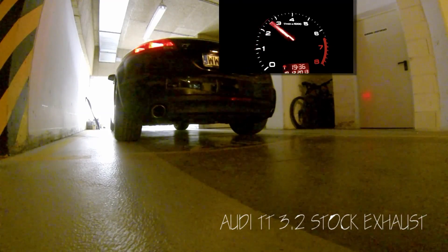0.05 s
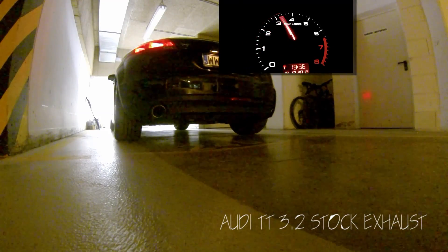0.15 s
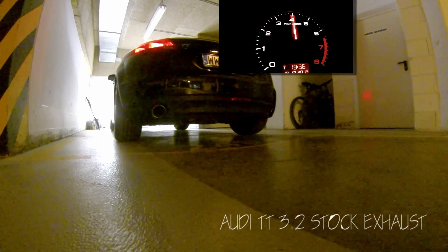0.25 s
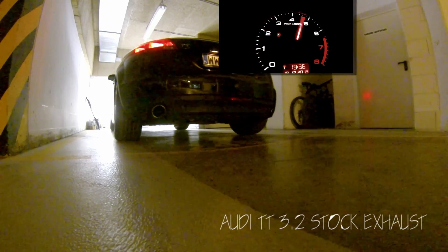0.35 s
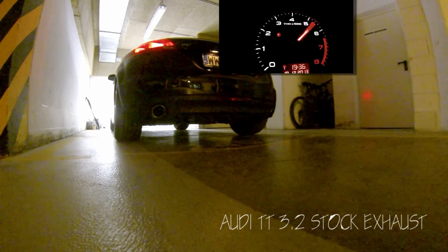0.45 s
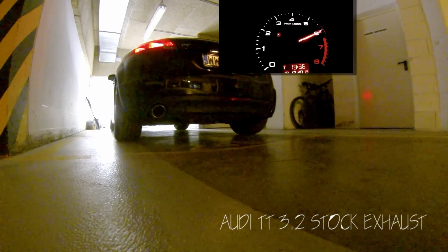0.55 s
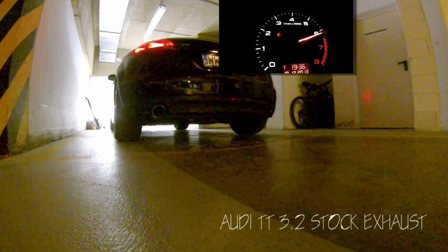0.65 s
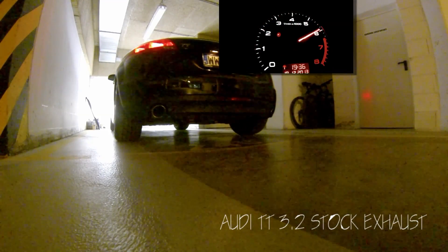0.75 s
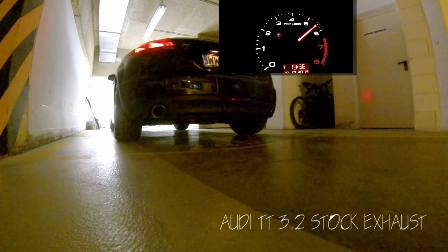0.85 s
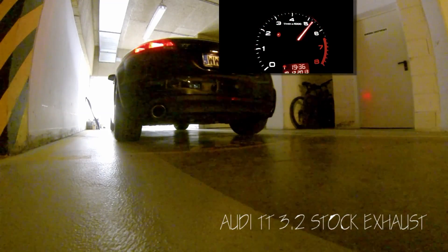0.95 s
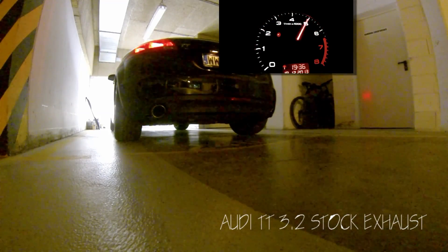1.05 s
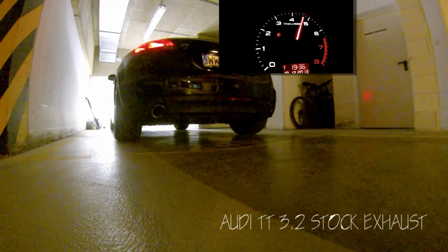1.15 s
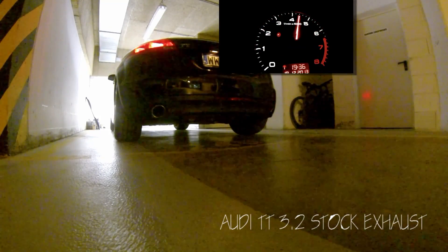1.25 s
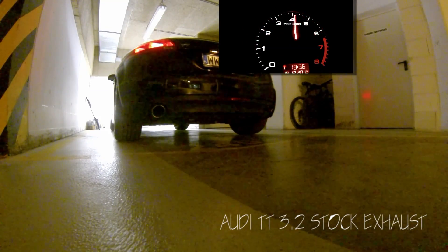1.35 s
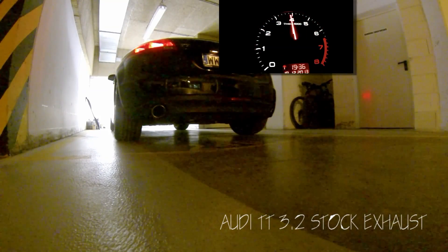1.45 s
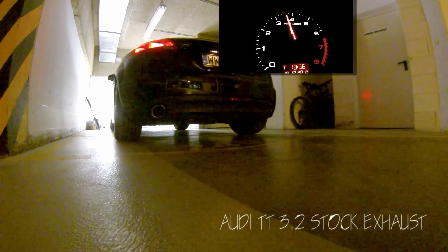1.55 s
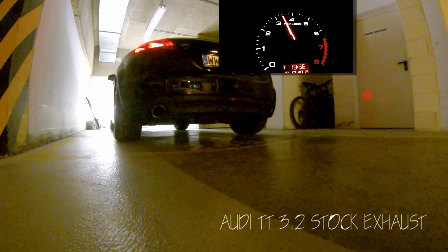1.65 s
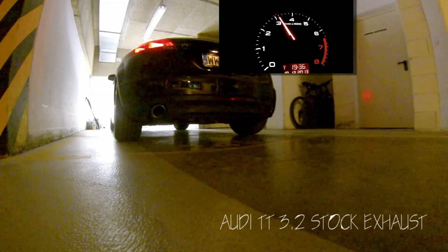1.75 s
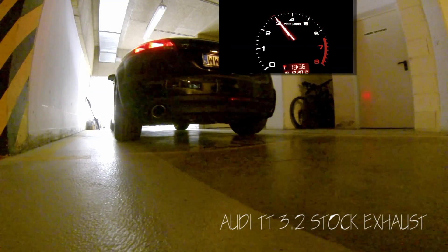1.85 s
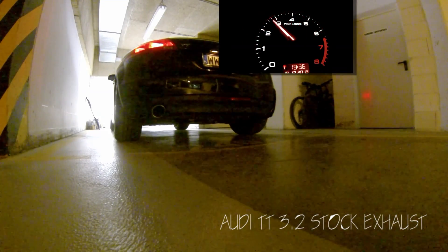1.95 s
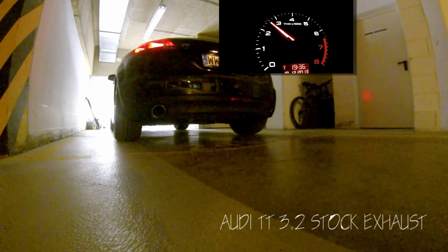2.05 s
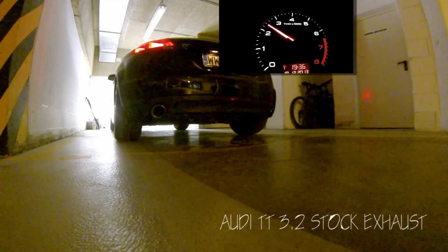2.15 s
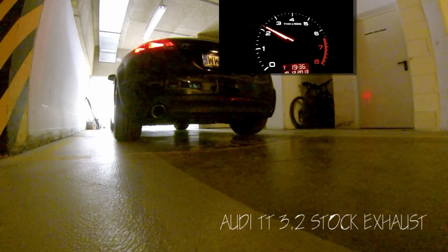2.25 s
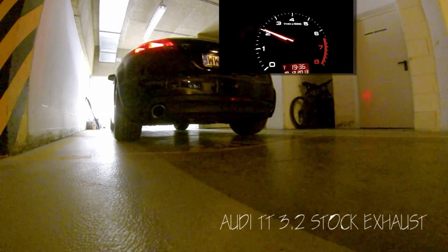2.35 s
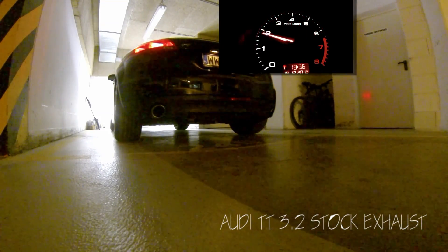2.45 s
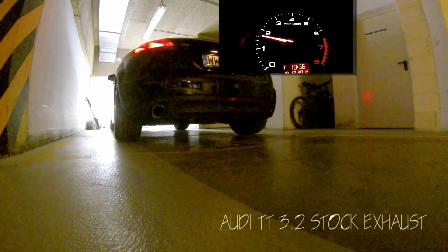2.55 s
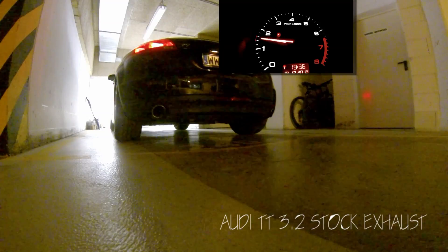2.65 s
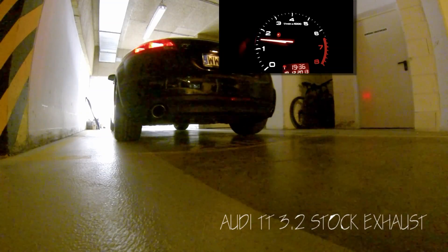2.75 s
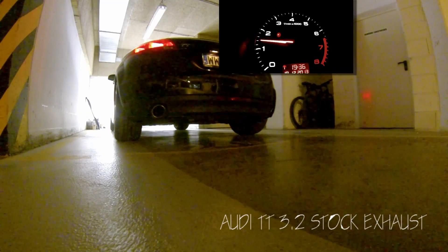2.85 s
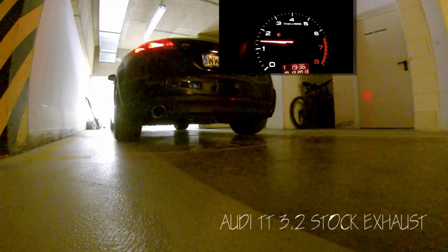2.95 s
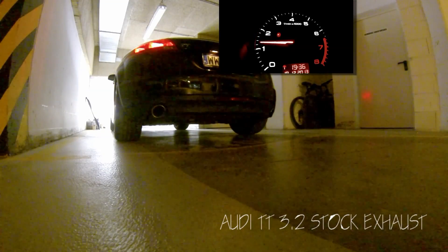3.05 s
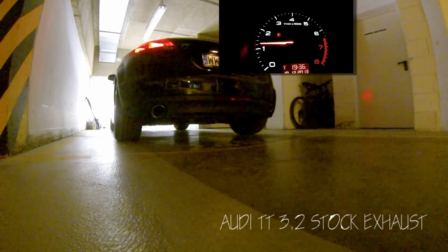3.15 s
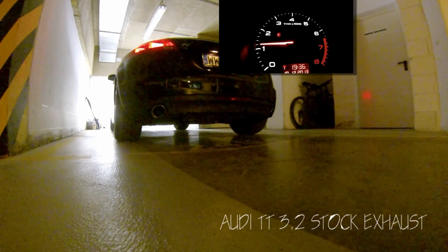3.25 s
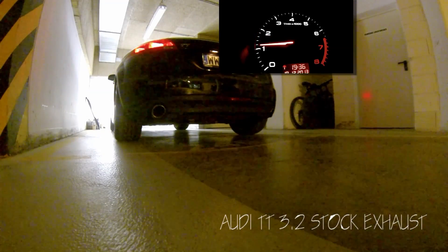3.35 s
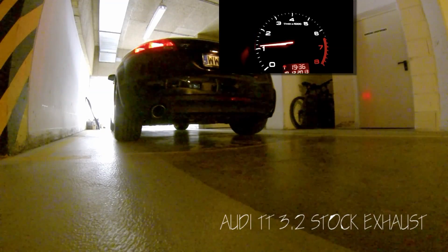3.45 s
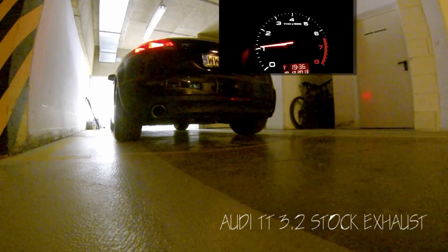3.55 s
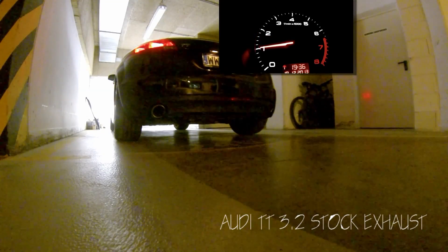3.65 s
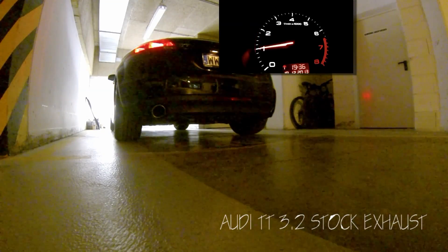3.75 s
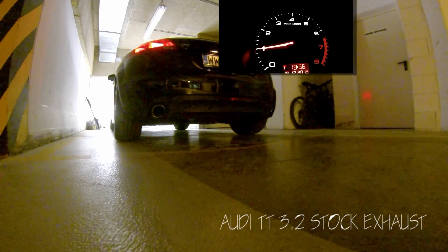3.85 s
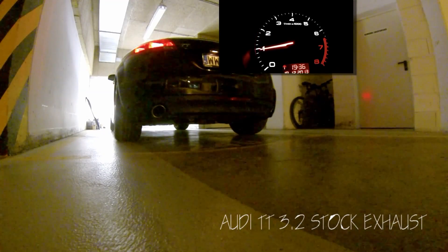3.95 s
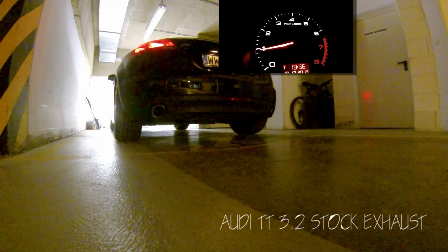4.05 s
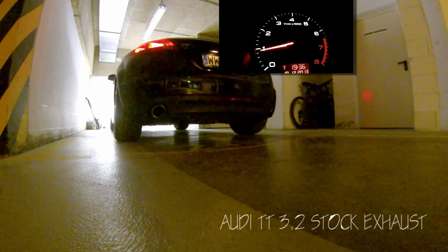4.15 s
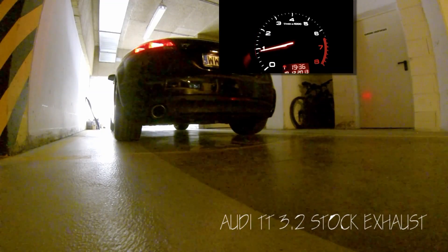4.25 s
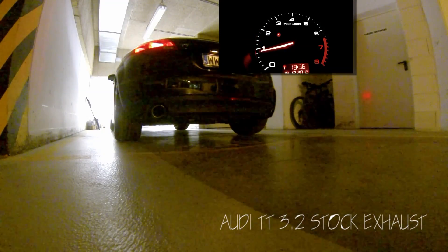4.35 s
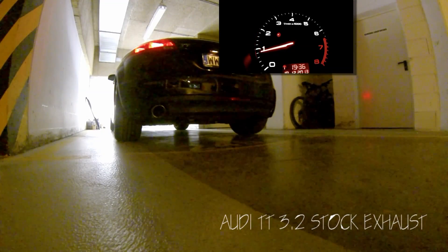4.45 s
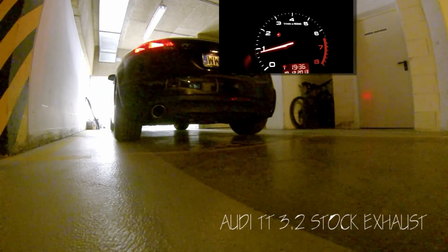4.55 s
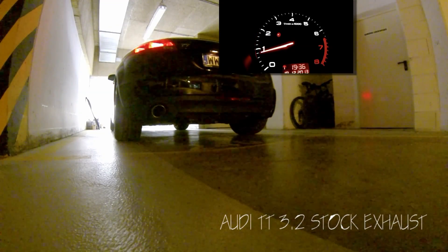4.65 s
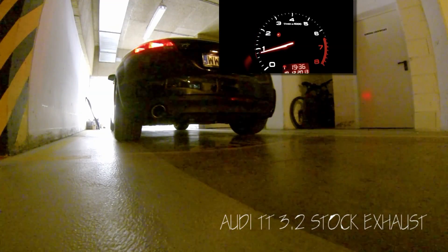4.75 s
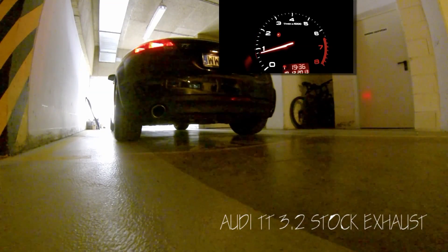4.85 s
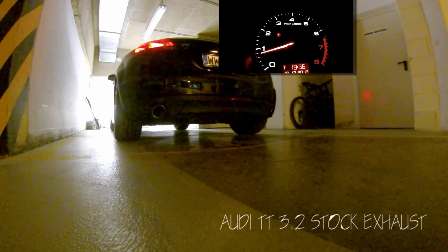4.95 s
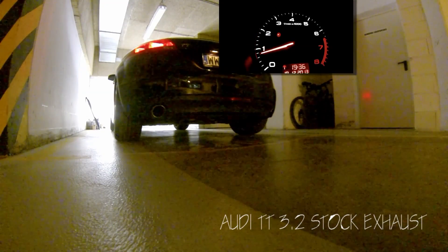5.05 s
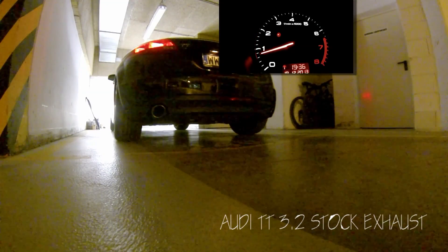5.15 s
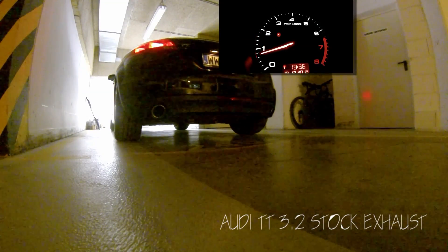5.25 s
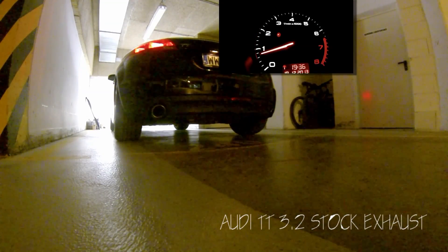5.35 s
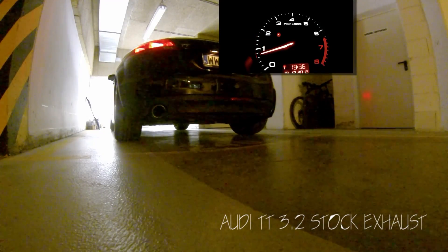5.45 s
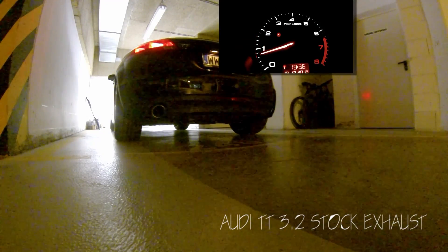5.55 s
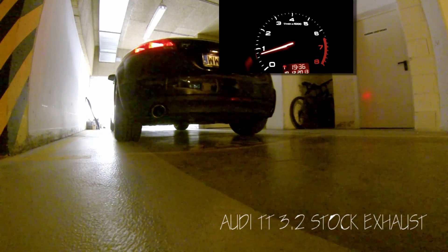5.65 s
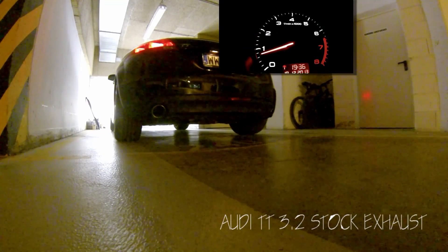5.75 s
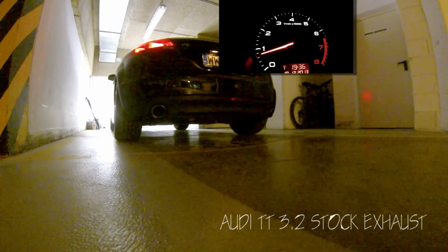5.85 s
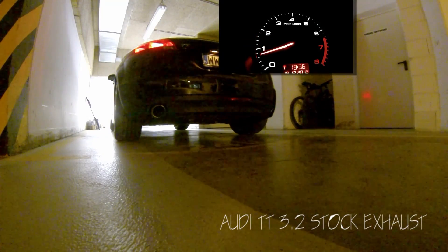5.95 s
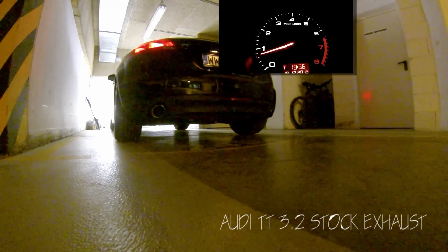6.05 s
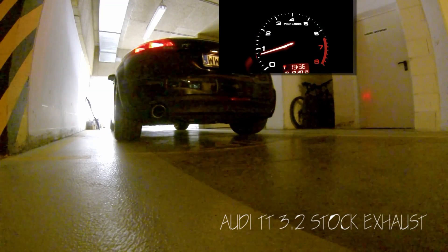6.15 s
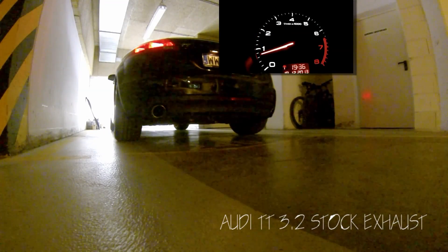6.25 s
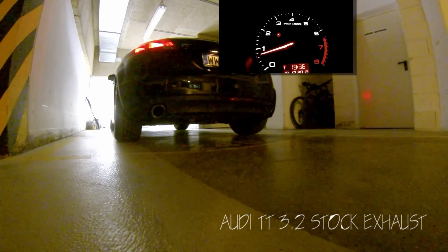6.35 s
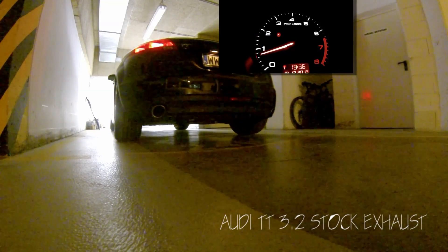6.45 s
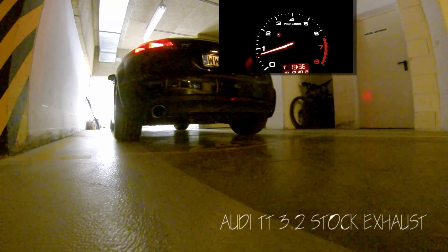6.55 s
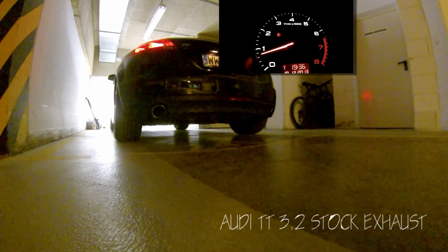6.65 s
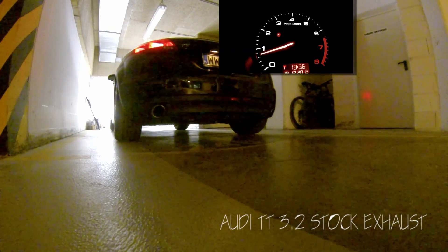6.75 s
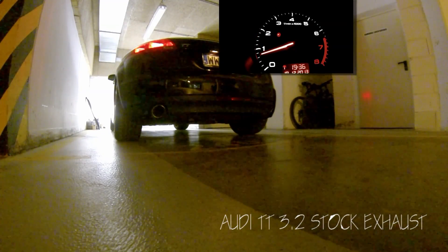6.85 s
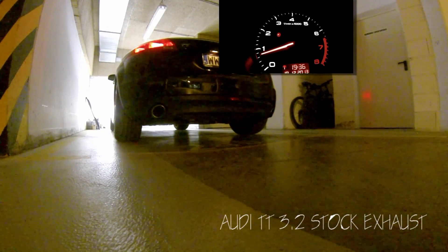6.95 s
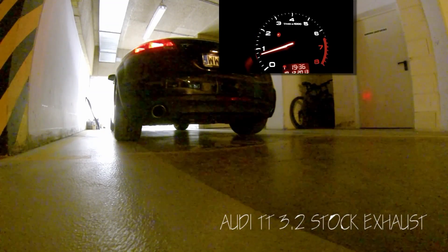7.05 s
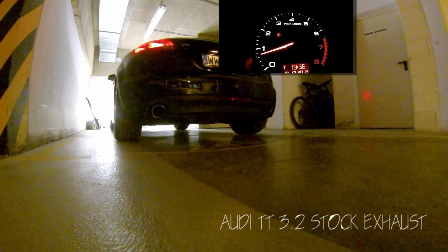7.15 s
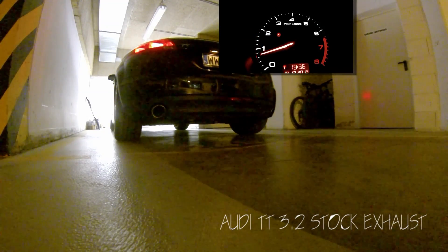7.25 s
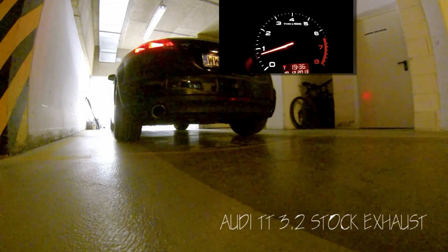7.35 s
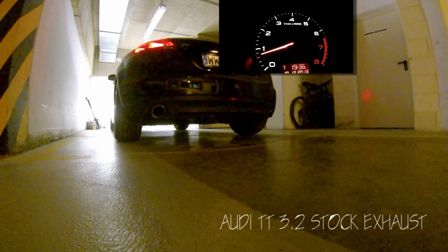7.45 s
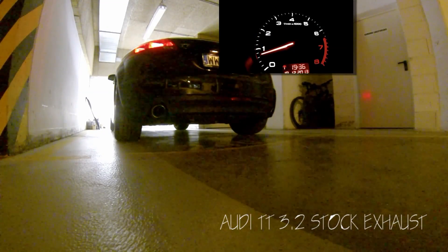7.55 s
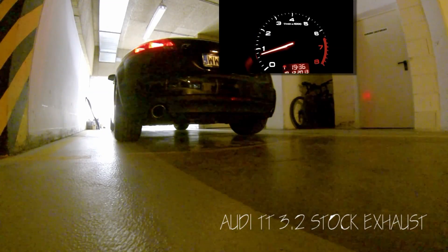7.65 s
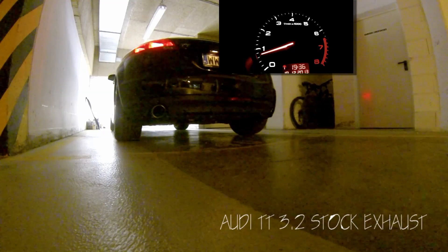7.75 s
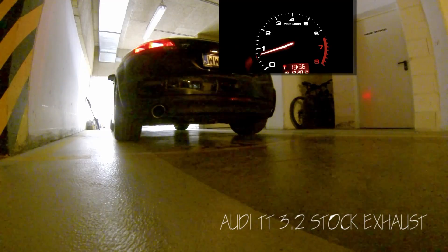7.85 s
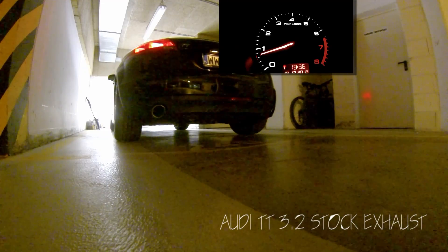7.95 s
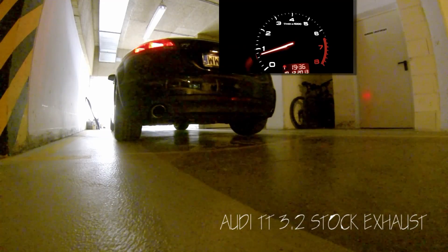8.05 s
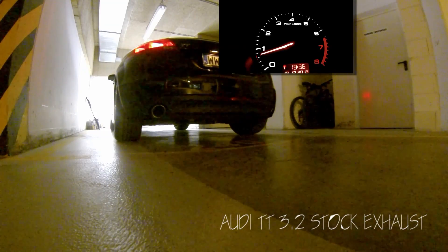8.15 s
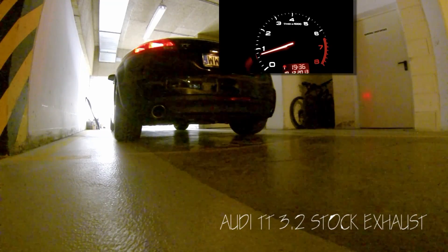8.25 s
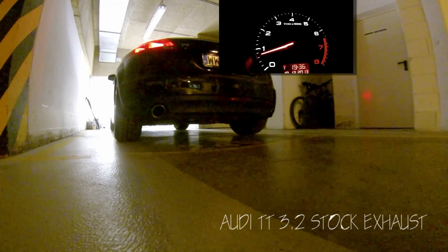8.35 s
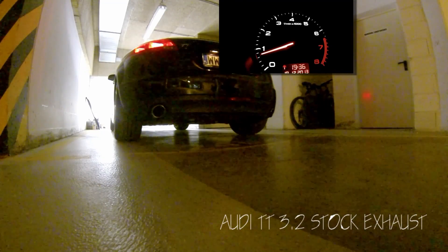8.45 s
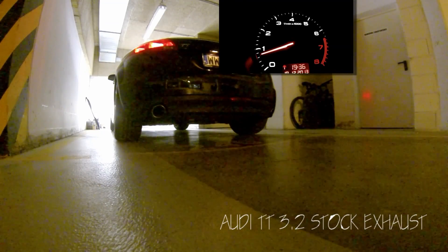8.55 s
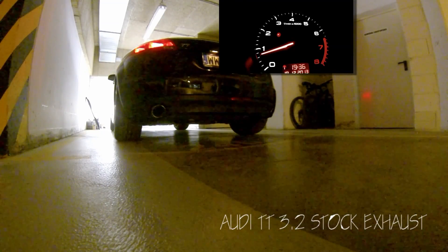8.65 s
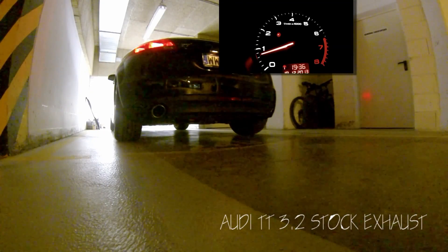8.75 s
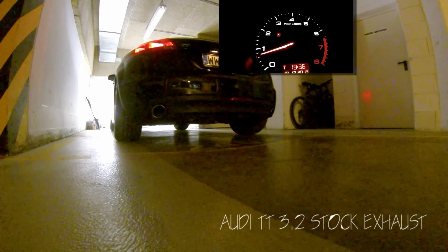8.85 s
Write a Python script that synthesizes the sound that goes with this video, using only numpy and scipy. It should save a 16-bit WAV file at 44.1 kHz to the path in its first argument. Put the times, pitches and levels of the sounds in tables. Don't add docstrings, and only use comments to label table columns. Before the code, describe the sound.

A six-cylinder car stands in an enclosed concrete garage, heard from behind by a small camera microphone. From 0 seconds the engine is already rising, its low growl sweeping fast to a loud, throaty peak near 0.7 seconds. Gas roars in the tailpipe, barking at about 0.25, and short dull pops crackle between 0.3 and 0.9, with brief garage echoes. Near 0.95 the throttle shuts; the roar drops back and the pitch glides smoothly down until 3 seconds, a hollow drone under bright engine-bay hiss. Around 3 the fuel returns, with a small rise in speed near 3.5. A faint high whine appears about 3.7 to 4.3 and sinks away. From 4 to 5.5 the note lowers, lumpy and slightly uneven. From about 6 to 8.9 seconds it idles quietly and steadily, a low regular burble with soft gas noise, gentle valve ticking and a slow, faint throb in the hiss.

```python
import sys
import numpy as np
from scipy import signal
from scipy.fft import rfft, irfft, next_fast_len
from scipy.io import wavfile

SR = 44100
rng = np.random.default_rng(int(sys.argv[2]) if len(sys.argv) > 2 else 0)


def to_wav(s):
    ch = np.atleast_2d(s).T
    pcm = np.round(np.clip(ch, -1, 1) * 32767)
    wavfile.write(sys.argv[1], SR, pcm.astype(np.int16))


def undo_db(level):
    steps = np.asarray(level, float) / 20
    return 10 ** steps


N = 392931
TIME = np.arange(N) / SR
THROTTLE_SHUT_S, FUEL_BACK_S, PUMPING_ENDS_S = 0.95, 2.93, 3.36
IDLE_FROM_S, IDLE_REACHED_S = 3.68, 5.84

# multiple of the four-stroke cycle, then level in dB with throttle open,
# in dB coasting, in dB with fuel back, in dB at idle.
LEADING_ORDERS = [
    (2, -36, -50, -51, -78),
    (4, -30, -31, -58, -76),
    (6, -35, -41, -30, -40),
    (8, -33, -35.5, -51, -67),
    (12, -32, -32.5, -45.5, -49.5),
]


def in_time(rows):
    s, *columns = np.transpose(rows)
    return [np.interp(TIME, s, c) for c in columns]


def at_hz(points, hz):
    point_hz, value = np.transpose(points)
    return np.interp(np.log(hz + 1), np.log(point_hz), value)


def rms_one(x):
    return x / np.sqrt(np.mean(x ** 2) + 1e-20)


def ramp(from_s, to_s):
    return np.clip((TIME - from_s) / (to_s - from_s), 0, 1)


def hump(s, width_s):
    return np.exp(-((TIME - s) / width_s) ** 2)


def drift(rate, step=1):
    r = np.exp(-80 * np.pi * rate / SR)
    slow = signal.lfilter([1], [1, -2 * r, r * r], rng.standard_normal(N // 40 + 2002))[2000:]
    return np.interp(np.arange(0, N, step) / 40, np.arange(len(slow)), rms_one(slow))


def coloured(spectrum, low_hz, high_hz):
    size = next_fast_len(N)
    hz = np.arange(size // 2 + 1) * SR / size
    bins = rfft(rng.standard_normal(size)) * undo_db(at_hz(spectrum, hz))
    inside = irfft(bins * (hz > low_hz) * (hz < high_hz), size)
    return irfft(bins, size)[:N] / inside.std()


def resonate(x, hz, width):
    r = np.exp(-np.pi * width / SR)
    zeros = np.array([1, 0, -1]) * (1 - r * r) / 2
    return signal.lfilter(zeros, [1, -2 * r * np.cos(2 * np.pi * hz / SR), r * r], x)


def by_state(open_db, coast_db, fired_db, idle_db, fired_s):
    shut = ramp(THROTTLE_SHUT_S - .03, THROTTLE_SHUT_S + 0.034)
    fired = ramp(fired_s - .06, fired_s + 0.1)
    idle = ramp(IDLE_FROM_S, IDLE_REACHED_S)
    return open_db + shut * (coast_db - open_db) + fired * (fired_db - coast_db) + idle * (idle_db - fired_db)


def garage(x):
    size = next_fast_len(N + SR)
    w = 2 * np.pi * np.arange(size // 2 + 1) / size
    t60_s = .6 / (1 + w * SR / 22000)
    echo = 0
    for k, lag in enumerate(rng.uniform(.02, .06, 10) * SR):
        loop = undo_db(-60 * lag / SR / t60_s) * np.exp(-1j * w * round(lag))
        echo = echo + (-1) ** k * loop / (1 - loop)
    wet = irfft(rfft(x, size) * echo, size)[:N] / np.sqrt(10)
    return x + undo_db(-7) * wet


def standing_gain(hz):
    # mode in Hz, width in Hz, level in dB.
    wall_modes = [(36.93, 0.83, 0), (50.3, 3.95, 10), (80.7, 9.6, 1), (288, 45, 2.5), (411, 87, 3)]
    hz = hz[::32]
    waves = 1 + sum(undo_db(db) / (1 + 2j * (hz - mode_hz) / width) for mode_hz, width, db in wall_modes)
    node_db = -8.5 * np.exp(-((hz - 43.4) / 2.55) ** 2)
    silencer_db = -11 / (1 + (94 / hz) ** 8)
    return np.repeat(np.abs(waves) * undo_db(node_db + silencer_db), 32)[:N]


def cavities(swing_db):
    # resonance in Hz, width in Hz.
    modes = [(51, 4), (201, 8), (325, 14), (462, 20), (1008, 40), (1660, 60), (1822, 30)]
    # level in dB at mean gas effort, share of the gas swing.
    flow = [(-58, 0.94), (-63, .5), (-72, 0.43), (-54.5, 0.66), (-62, .6), (-57, 0.64), (-61, 0.75)]
    # cavity in Hz, start in seconds, end in seconds, level in dB.
    swells = [(51, 0.24, 0.23, -17.5), (51, 0.55, 0.66, -26.5), (51, 0.91, 0.92, -25), (51, 3.2, 3.03, -29),
              (51, 3.3, 3.48, -34.5), (51, 4.6, 4.8, -38.5), (201, .48, 0.67, -27), (325, 2.3, 2.75, -37.5),
              (1008, 5.45, 9, -60), (1822, 1.76, 2.5, -41), (1822, 2.5, 3.18, -50.5)]
    swell_db_per_s = 90
    white, out = rng.standard_normal(N), 0
    for (hz, width), (db, share) in zip(modes, flow):
        db = db + share * swing_db
        for swell_hz, from_s, to_s, top_db in swells:
            if abs(swell_hz / hz - 1) < .08:
                outside_s = np.maximum(np.maximum(from_s - TIME, TIME - to_s), 0)
                db = np.maximum(db, top_db - swell_db_per_s * outside_s)
        ringing = resonate(resonate(white, hz, 1.5 * width), hz, 1.5 * width)
        out = out + undo_db(db) * rms_one(ringing)
    return out


def hiss(fast, turn, level_db, jet_db):
    # frequency in Hz, density in dB.
    bay_revving = [(650, -36), (1100, -3), (1450, -3.5), (1830, 1.5), (2520, -10), (3010, -9.5),
                   (3620, -16.5), (4610, -25.5), (5180, -27.5), (5860, -32.5), (7000, -42), (9100, -81),
                   (15400, -120)]
    bay_idling = [(650, -32), (1100, 3.5), (1180, -5.5), (1280, 1), (1400, -7.5), (1620, 2), (1890, -5),
                  (2040, -2.5), (2600, -11), (3030, -5.5), (3490, -14), (4360, -16.5), (7000, -37.5),
                  (9100, -71), (15400, -120)]
    jet_spectrum = [(2650, 8), (4500, -1.5), (5170, -2), (5870, -10.5), (6530, -8), (7090, -11),
                    (8570, -8.5), (9880, -15), (11100, -14.5), (12000, -9.5), (12800, -17), (13300, -21.5),
                    (15300, -14)]
    bay = fast * coloured(bay_revving, 1300, 4500) + (1 - fast) * coloured(bay_idling, 1300, 4500)
    throb_db = 1.6 * (1 - fast) * np.cos(2 * np.pi * 4.06 * (TIME - 7.01))
    ticking = 1 + 0.07 * np.cos(6 * turn + 1)
    jet = coloured(jet_spectrum, 6780, 10000) * undo_db(jet_db + 0.48 * drift(90))
    return bay * undo_db(level_db + throb_db + 0.55 * drift(17)) * ticking + jet


def whine(turn):
    # time in seconds, level in dB.
    whine_level = [
        (0, -68),
        (3.4, -87),
        (3.65, -60.5),
        (4.0, -58),
        (4.3, -65),
        (8.91, -83),
    ]
    return undo_db(in_time(whine_level)[0]) * np.sqrt(2) * np.cos(48 * turn)


def roar(fast, turn, level_db, pipe_db):
    # frequency in Hz, density in dB per Hz.
    gas_revving = [(18, -33), (30, -3), (81, 5), (155, -3), (243, -7.5), (319, -3.5), (524, -7),
                   (571, -5.5), (1020, -8.5), (1320, -25), (1800, -15.5), (2340, -23.5), (3960, -120)]
    gas_idling = [(18, -32), (30, -6), (59, -26), (251, -19), (319, -22.5), (465, -27), (524, -29),
                  (892, -30.5), (1010, -31), (1190, -43.5), (1800, -49.5), (2340, -44), (3960, -120)]
    # frequency in Hz, width in Hz, level in dB.
    pipe_modes = [(337.8, 46, 4.5), (429.8, 37, 7), (558.5, 38, 0), (709, 31, 3.5), (838, 15, -8),
                  (1023, 96, -32), (1217, 32, -5)]
    gas = fast * coloured(gas_revving, 506, 1200) + (1 - fast) * coloured(gas_idling, 273, 1300)
    gas = signal.lfilter(*signal.butter(1, 150, "high", fs=SR), gas)
    white = rng.standard_normal(N)
    pipe = rms_one(sum(undo_db(db) * resonate(resonate(white, hz, w), hz, w) for hz, w, db in pipe_modes))
    gas_share_db = -2.5 - 3.5 * fast
    puffs = 1 + 0.037 * np.cos(6 * turn)
    return undo_db(level_db) * (undo_db(gas_share_db) * gas + undo_db(pipe_db) * pipe) * puffs


def pops():
    # time in seconds, peak in dB.
    bangs = [(0.327, -32.5), (.357, -28), (.37, -30), (.394, -20.5), (.408, -27), (0.429, -22.5),
             (.505, -28), (.533, -25), (0.751, -26), (.845, -25), (0.884, -23), (4.585, -60)]
    decay_s, crack_db = 0.0052, -27
    s, db = np.transpose(bangs)
    clicks = np.zeros(N)
    clicks[(s * SR).astype(int)] = undo_db(db)
    envelope = signal.lfilter([1], [1, -np.exp(-1 / (decay_s * SR))], clicks + 1e-18)
    white = rng.standard_normal(N)
    body = rms_one(resonate(white, 460, 410))
    return envelope * (body + undo_db(crack_db) * np.gradient(white))


def weak_orders(cycle_hz, turn, fast, level_db):
    # frequency in Hz, gain in dB.
    response = [(15, -27), (30, -15.5), (52, 5), (100, -6.5), (140, -0.5), (200, -18.5), (260, -5),
                (330, -5.5), (430, -2), (600, -11), (900, 0.5)]
    # multiple of the cycle, level in dB.
    idle_shape = [(1, -36), (4, -24), (6, -17), (13, -23), (20, -18), (26, -22), (49, -30)]
    # multiple of the cycle, level in dB.
    idle_peaks = [(3, -31), (5, -14.5), (7, -15), (9, -9.5), (15, -19), (17, -15), (18, -10.5), (21, -13),
                  (24, -23), (30, -20)]
    slope_db, wobble_db = -2.5, 3.5
    peak_db = {round(m): db for m, db in idle_peaks}
    leading = [round(row[0]) for row in LEADING_ORDERS]
    coarse = slice(0, N, 64)
    slow_hz, slow_fast = cycle_hz[coarse], fast[coarse]
    late_db = -6.5 * (1 - ramp(5.07, IDLE_REACHED_S)[coarse])
    catch = np.exp(-((TIME[coarse] - 4.7) / .3) ** 2)
    out = np.zeros(N)
    for k in range(1, 50):
        if k in leading:
            continue
        phase, wobble = rng.uniform(0, 2 * np.pi), drift(3.3, step=64)
        bank_pulse = k % 6 == 0 or k in (9, 21)
        rev_db = slope_db * np.log2(k) + at_hz(response, k * slow_hz) - max(k - 26, 0)
        rev_db = rev_db + 6 * (k == 3) * np.clip(slow_hz / 10 - 3.5, 0, 1)
        idle_db = peak_db.get(k, at_hz(idle_shape, k - 1)) - 3 * (k % 3 > 0) + (8 < k < 22) * late_db
        lope_db = 16.0 * (k in (5, 7)) * catch
        unsteady = .3 * slow_fast + (.3 if bank_pulse else .8)
        db = slow_fast * rev_db + (1 - slow_fast) * idle_db + lope_db + wobble_db * unsteady * wobble
        tone = np.cos(k * turn + phase * (fast if bank_pulse else 1))
        out += np.repeat(undo_db(db), 64)[:N] * tone
    return np.sqrt(2) * undo_db(level_db) * out


def strong_lines(cycle_hz, turn, pump_share):
    pump_multiples = (7.5, 10, 16)
    scatter = rng.uniform(-np.pi, np.pi, len(LEADING_ORDERS))
    out = 0
    for (k, open_db, coast_db, fired_db, idle_db), phase in zip(LEADING_ORDERS, scatter):
        k = round(k)
        coast_db = coast_db + (k == 2) * 17 * np.log2(cycle_hz / 20)
        db = by_state(open_db, coast_db, fired_db, idle_db, PUMPING_ENDS_S if k < 7 else FUEL_BACK_S)
        db = db + (k == 4) * 8 * hump(0, .045)
        db = db - (k == 12) * 12.5 * hump(4.95, 0.43)
        db = db + 1.55 * drift(2.2)
        out = out + undo_db(db) * standing_gain(k * cycle_hz) * np.cos(k * turn + phase * pump_share)
    pump_db = by_state(-31.5, -36, -50, -50, FUEL_BACK_S)
    pump = sum(standing_gain(k * cycle_hz) * np.cos(k * turn) for k in pump_multiples)
    return np.sqrt(2) * (out + pump_share * undo_db(pump_db) * pump)


def scene():
    # time in seconds, four-stroke cycles in Hz.
    speed = [(0, 14.6), (.25, 29.1), (.5, 43.5), (.7, 48.2), (.8, 46.8), (1, 40.4), (1.3, 33.1),
             (1.9, 21.9), (2.2, 17.3), (2.65, 12.5), (2.95, 9.15), (3.1, 8.99), (3.52, 10), (4, 8.4),
             (4.55, 7.1), (5.25, 6.17), (5.9, 5.93), (8.91, 5.85)]
    # time in seconds, exhaust gas in dB, engine bay in dB.
    effort = [(0, -38, -59), (.17, -35, -46), (.24, -25.5, -46), (.4, -19, -45), (.62, -21.5, -33),
              (.83, -20, -28.5), (.88, -23, -36.5), (.93, -30.5, -38.5), (1.2, -29, -36),
              (2.2, -30.5, -35.5), (2.7, -33.5, -38.5), (2.97, -38, -41.5), (3.5, -47, -49.5),
              (3.9, -50.5, -53), (4.6, -47.5, -60), (5.2, -50.5, -60), (5.7, -52.5, -60),
              (8.91, -52.5, -60)]
    cycle_hz, = in_time(speed)
    turn = 2 * np.pi * np.cumsum(cycle_hz) / SR
    roar_db, hiss_db = in_time(effort)
    swing_db = roar_db + 38
    jet_db = -67.5 + 0.3 * swing_db + 6.5 * np.log2(cycle_hz / 20)
    weak_db = by_state(-34.5, -34.5, -39.5, -39, FUEL_BACK_S) - 3 * hump(3.84, 0.53)
    pipe_db = by_state(-4, -13, -13, -24, FUEL_BACK_S) + 8 * hump(.26, 0.082)

    gas_fast = np.clip((cycle_hz - 6.1) / 2.0, 0, 1)
    bay_fast = np.clip((cycle_hz - 7.0) / 3.85, 0, 1)
    weak_fast = np.clip((cycle_hz - 7.2) / 1.5, 0, 1)
    pump_share = np.clip((cycle_hz - 8) / 4, 0, 1)
    racing = np.clip((cycle_hz - 11) / 25, 0, 1)

    gas = cavities(swing_db) + hiss(bay_fast, turn, hiss_db, jet_db) + roar(gas_fast, turn, roar_db, pipe_db)
    lines = weak_orders(cycle_hz, turn, weak_fast, weak_db) + strong_lines(cycle_hz, turn, pump_share)
    steady = (1 - racing) * lines + whine(turn)
    return (steady + gas + garage(racing * lines + pops()))[None]


def top_cut(x):
    return signal.sosfilt(signal.butter(12, 15410, fs=SR, output="sos"), x)


def record(dry):
    # centre in seconds, width in seconds,
    # mids in dB, bass in dB.
    mirror_drift = [
        (0, 0.17, 9, 14),
        (1.4, .7, 1, 13),
        (2.4, 0.99, -14.5, 2),
        (3.701, 0.24, -3, 16),
    ]
    mids_db = -33 + sum(db * hump(s, width) for s, width, db, _ in mirror_drift)
    bass_db = -64.5 + sum(db * hump(s, width) for s, width, _, db in mirror_drift)
    x = signal.sosfilt(signal.butter(1, 10, "high", fs=SR, output="sos"), dry)
    mids = signal.sosfilt(signal.butter(2, [280, 800], "band", fs=SR, output="sos"), x)
    bass = signal.sosfilt(signal.butter(2, 200, fs=SR, output="sos"), x)
    carrier = 2 * np.cos(2 * np.pi * 12000 * TIME)
    x = x + carrier * (undo_db(mids_db) * mids + undo_db(bass_db) * bass)
    x = signal.sosfilt(signal.cheby2(10, 30, 15500, fs=SR, output="sos"), x)
    return top_cut(x)


dry = scene()
out = record(dry)
to_wav(out)
```